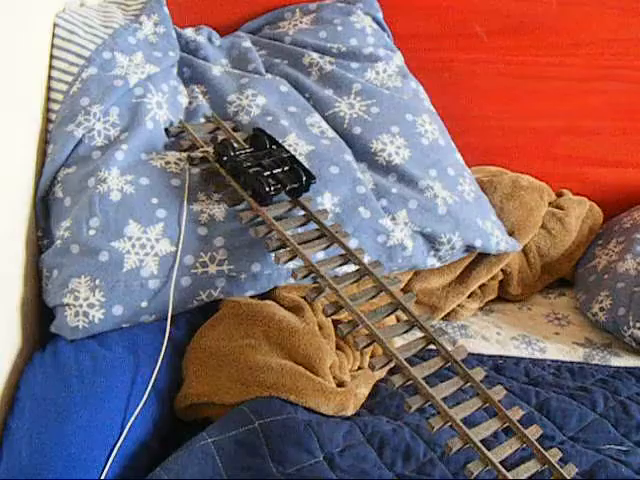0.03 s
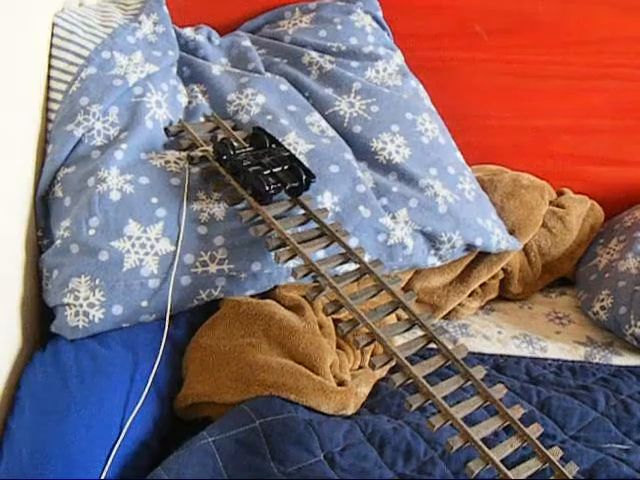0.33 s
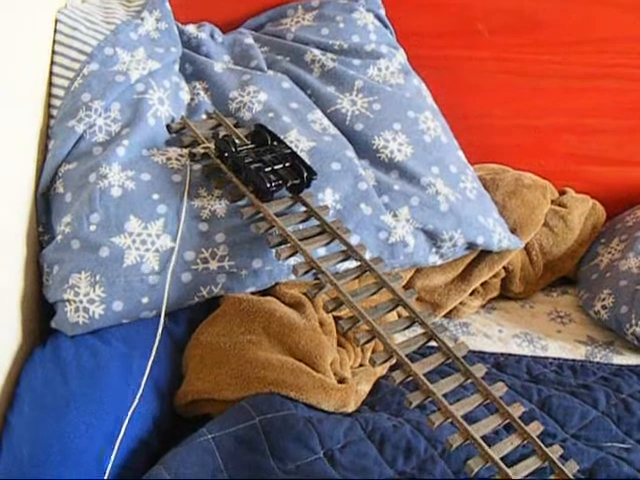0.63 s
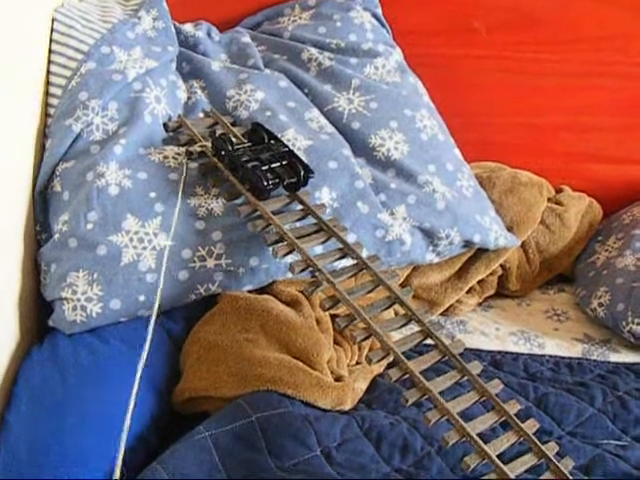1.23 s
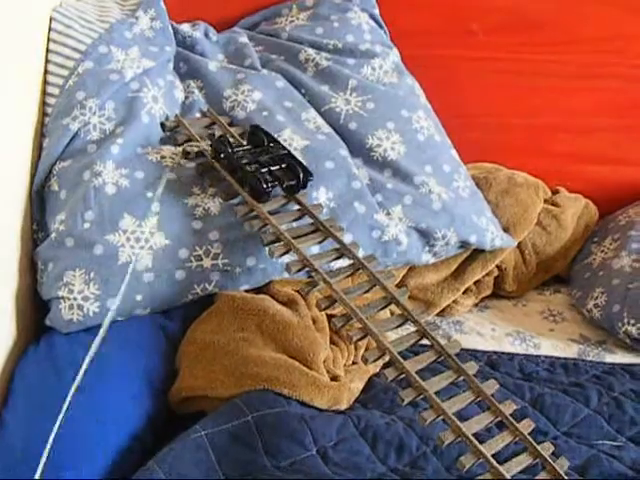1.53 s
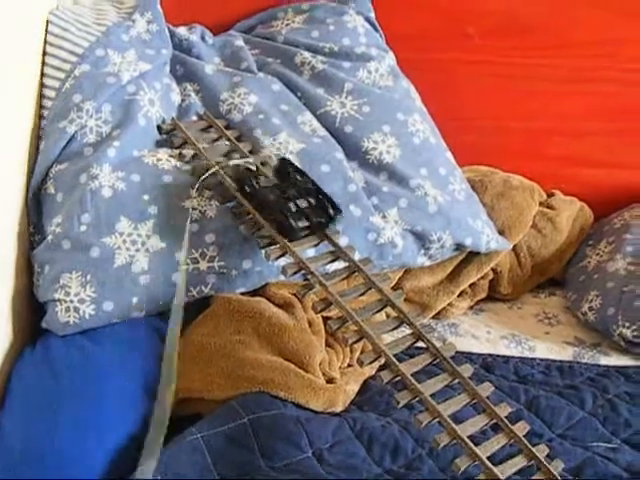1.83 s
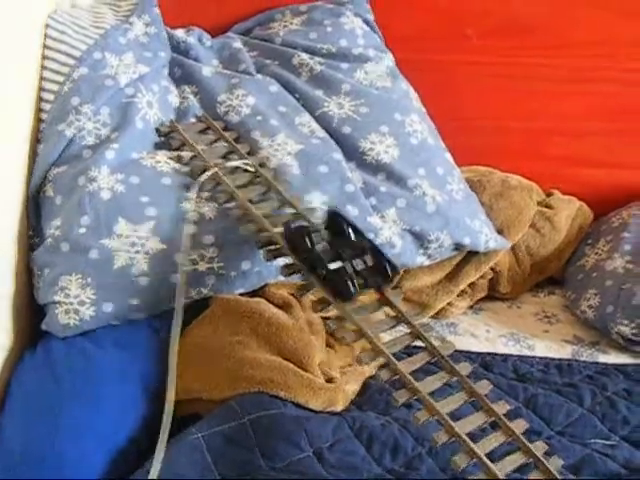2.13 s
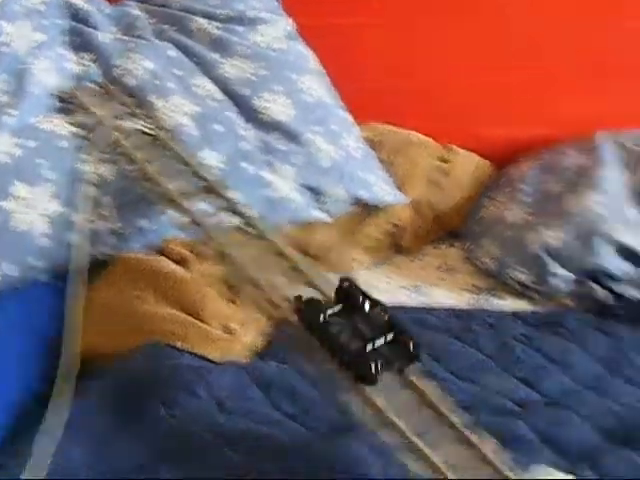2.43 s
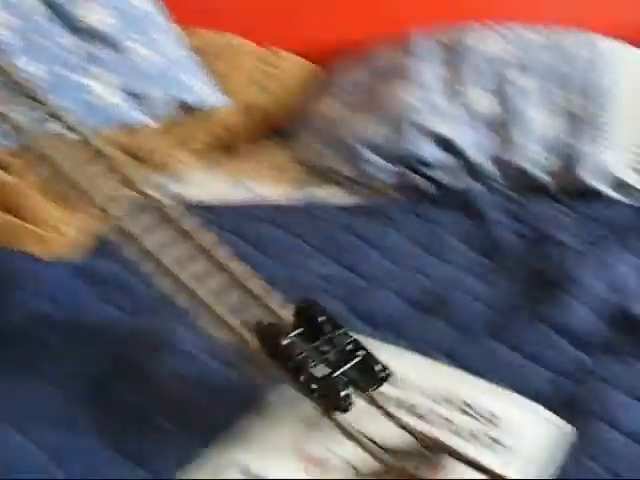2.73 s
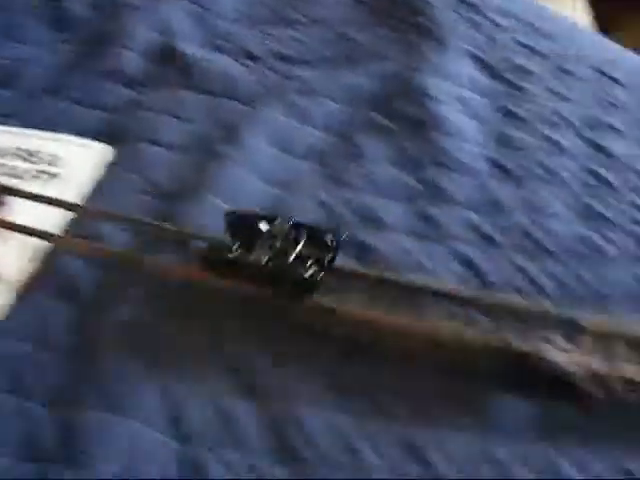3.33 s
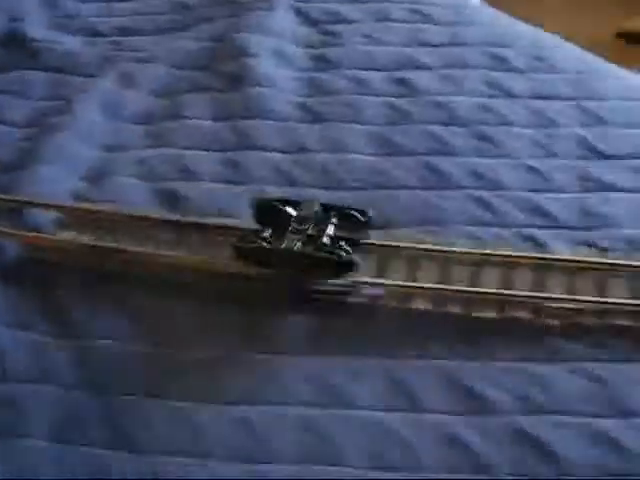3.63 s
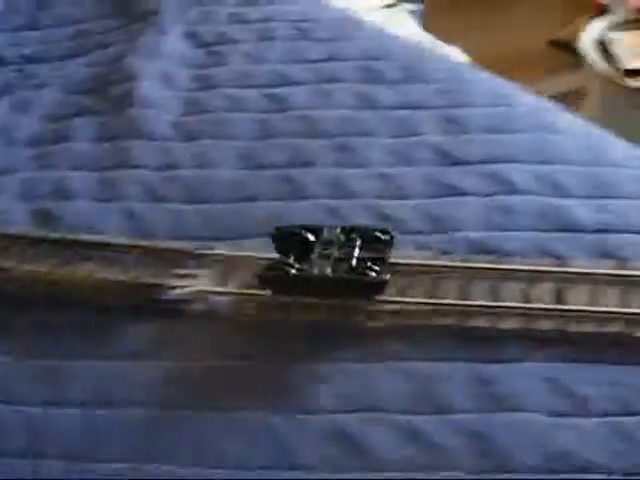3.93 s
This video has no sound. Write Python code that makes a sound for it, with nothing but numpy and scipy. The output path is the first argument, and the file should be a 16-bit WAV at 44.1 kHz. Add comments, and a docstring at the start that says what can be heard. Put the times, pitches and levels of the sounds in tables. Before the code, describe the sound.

Model train wheels whirr and clatter along rails after a few light finger clicks.

```python
"""A small model-railway truck whirrs down a sloping track laid on soft bedding, in a quiet room. First fingers
click against it, then it drops onto its wheels and rolls. Rough rails shake the bedding, track, frame and
wheels. Wheel rims scrape, a wheel sings and the wheels knock over rail joints. A crude recorder rounds the
sound to coarse steps and holds each one, adding a gritty, metallic treble."""
import sys
import numpy as np
from scipy import signal
from scipy.fft import rfft, irfft
from scipy.io import wavfile

SR = 44100
rng = np.random.default_rng(int(sys.argv[2]) if len(sys.argv) > 2 else 0)


def output_pcm(signal):
    """Save a mono or channel-first signal as 16-bit PCM at the path in sys.argv[1].

    Samples are clipped to [-1, 1] before scaling.
    """
    pcm = np.clip(np.atleast_2d(signal).T, -1, 1) * 32767
    wavfile.write(sys.argv[1], SR, np.round(pcm).astype(np.int16))


N = 176400
T = np.arange(N) / SR

# the tone of the room's hush: pitch_hz, relative_db
ROOM_TONE = [(25, -2.5), (60, 0), (150, 0.5), (300, -5), (600, -8.5), (1100, -9.5), (1600, -15.5),
             (2100, -21.5), (2700, -36)]
# fingers click on the truck: start_s, level_db, extra_low_ring_db
FINGER_CLICKS = [(0.263, -23.5, -3.5), (0.2656, -16.5, 3.5), (0.2698, -26, 1), (1.573, -33.5, -8),
                 (1.59, -20.5, -4)]
# the notes in one click (a fade is a drop of 60 dB): pitch_hz, relative_db, fade_s
CLICK_NOTES = [(313.5, -7.5, 0.031), (409.4, -10, 0.054), (708, -2, 0.018), (1018, -6.5, 0.04),
               (1340, -13.5, .025), (1620, -18.5, 0.027), (2246, -15.5, .02)]
# small parts tick: start_s, level_db, pitch_hz
PART_TICKS = [(.665, -55, 1300), (.727, -30.5, 1800), (.730, -34, 1830), (0.997, -30.5, 1170),
              (1.197, -33, 1135), (1.395, -35.5, 1376), (1.709, -20.5, 1470), (1.811, -33.5, 1310),
              (1.839, -33, 1410), (1.848, -26.5, 1535), (1.852, -33, 1520), (1.926, -34, 1466)]
# the track bumps on its bedding: peak_s, level_db, pitch_hz, half_length_s
TRACK_THUDS = [(1.225, -45, 58, 0.022), (1.725, -37.5, 153.5, 0.016), (2.249, -34.5, 87, 0.033),
               (2.452, -30, 88, .022), (3.11, -32.5, 100, 0.015), (3.128, -36, 58, 0.014)]
# the notes in the jolt from the hardest joint: pitch_hz, level_db, fade_s
JOLT_NOTES = [(235, -10, 0.022), (510, -3, 0.0057), (1560, -16, .005)]
# a wheel sings: peak_s, level_db, half_length_s
WHEEL_SINGS = [(2.627, -49, 0.18), (2.933, -41.5, 0.064), (3.2, -39.5, 0.13), (3.613, -50, 0.046)]
# wheel rims rub the rail: peak_s, level_db, rise_s, fall_s
RIM_SCRAPES = [(1.712, -36.5, .0015, 0.012), (1.755, -45.5, 0.012, 0.025), (2.0, -47.5, .08, 0.13),
               (2.052, -27.5, 0.021, 0.015), (2.669, -35.5, 0.017, .02), (3.12, -42, .04, 0.054),
               (3.188, -30.5, 0.078, 0.11), (3.25, -23.5, 0.02, 0.019), (3.611, -40, .02, 0.032),
               (3.964, -32.5, 0.016, 0.015), (3.992, -17, 0.0041, 0.024)]
# wheels land and cross joints: start_s, track_db, frame_db, wheels_db
WHEEL_KNOCKS = [(1.7095, -25, -26.5, -24), (1.7139, -19.5, -21, -23), (1.726, -23.5, -25, -37),
                (1.747, -28.5, -26, -35), (1.762, -25, -27, -35), (2.335, -21, -24.5, -24),
                (2.542, -23, -15, -40), (2.663, -17.5, -26, -23), (3.0115, -17, -7.5, -15),
                (3.0137, -22.5, -8.5, -10), (3.072, -15, -22, -31), (3.08, -25, -8.5, -14),
                (3.0864, -18, -13, -7), (3.103, -23, -19, -35), (3.15, -14.5, -21, -21),
                (3.171, -31, -12, -9), (3.534, -27, -29, -25), (3.555, -26, -23, -38),
                (3.729, -18.5, -13.5, -27), (3.8812, -21, -18, -21), (3.988, -24, -11, -15)]
# resonances, the notes each part likes to ring at: pitch_hz, width_hz, relative_db
SING_NOTES = [(2250, 45, 0)]
BEDDING_NOTES = [(35.6, 25, -13), (87.7, 35, -9.5), (121.3, 30, -6), (153.2, 26, -1), (190, 45, -3.5),
                 (224, 33, -9)]
TRACK_NOTES = [(261.3, 49, -6), (304, 25, -5.5), (335, 29, 1), (357.6, 30, -1.5), (429, 40, -6.5)]
FRAME_NOTES = [(466, 29, 2.5), (549, 34, -2), (626, 35, 2), (672.6, 30, -1.5), (738, 60, -2.5),
               (825, 15, 0), (861, 27, 2), (968.5, 60, -2), (1033, 67, -4), (1143, 60, -3)]
WHEEL_NOTES = [(1287, 110, -5.5), (1372, 45, -1.5), (1418, 60, -2), (1550, 120, -5.5), (1698, 150, -9),
               (1898, 90, -10), (2221, 59, -8.5), (2606, 220, -25)]
# rolling loudness before each part's trim, in three stages (gathering speed, downhill, on the level):
# time_s, bedding_db, track_db, frame_db, wheels_db
ROLL_STAGES = [
    [(1.87, -45, -50.5, -65.5, -50), (1.928, -32.5, -50, -49, -50), (1.95, -37, -38.5, -47.5, -49.5),
     (2.004, -38.5, -42.5, -51, -44.5), (2.058, -39, -40.5, -37.5, -39.5), (2.156, -35, -37, -51.5, -49.5),
     (2.218, -37.5, -34, -40, -48.5), (2.368, -36, -34, -37.5, -46), (2.4, -38, -30.5, -39, -43.5)],
    [(2.43, -36.5, -33, -31.5, -43.5), (2.458, -32, -39, -39, -46), (2.49, -39.5, -33, -33.5, -41),
     (2.716, -33, -30.5, -31.5, -40.5), (2.742, -42, -36.5, -34, -40), (2.774, -36, -29, -33.5, -41),
     (2.944, -42.5, -31.5, -30, -38), (3.042, -36, -29, -27.5, -34), (3.06, -31.5, -30.5, -24, -36.5)],
    [(3.115, -35.5, -27.5, -30, -29.5), (3.273, -34, -40, -33.5, -43), (3.355, -46, -42, -40.5, -48),
     (3.505, -44, -41, -43.5, -45), (3.559, -38, -37.5, -36.5, -45), (3.605, -40, -37.5, -37.5, -42.5),
     (3.801, -29.5, -39, -36.5, -42.5), (3.951, -42.5, -32.5, -33, -41.5), (3.97, -37, -44, -29, -42.5)],
]


def from_db(db):
    """Turn decibels into a volume factor."""
    return 10 ** (np.asarray(db) / 20)


def unit_power(sound):
    """Scale a sound to an average power of 1."""
    return sound / np.sqrt(np.mean(sound ** 2) + 1e-20)


def filtered(sound, kind, edge_hz, order=2):
    """Keep the low part, the high part or a middle band of a sound."""
    return signal.sosfilt(signal.butter(order, edge_hz, kind, fs=SR, output="sos"), sound)


def taps(times_s, level_db):
    """One sharp tap at each time."""
    out = np.zeros(N)
    np.add.at(out, (np.atleast_1d(times_s) * SR).astype(int), from_db(level_db))
    return out


def swell(peak_s, level_db, half_length_s):
    """A smooth, bell-shaped rise and fall in loudness."""
    return from_db(level_db) * np.exp(-((T - peak_s) / half_length_s) ** 2)


def ring(hits, pitch_hz, fade_s):
    """Each hit starts one pure note that dies away."""
    decay = from_db(-60 / (fade_s * SR))
    angle = 2 * np.pi * pitch_hz / SR
    return signal.lfilter([0, np.sin(angle)], [1, -2 * decay * np.cos(angle), decay ** 2], hits + 1e-18)


def resonate(push, notes, damping=1, in_step=False):
    """A part rings at all its notes, in step where it is struck. More damping shortens the ring."""
    out = 0
    for k, (hz, width_hz, db) in enumerate(notes):
        decay = np.exp(-np.pi * width_hz * damping / SR)
        sign = 1 if in_step else (-1) ** k
        feedback = [1, -2 * decay * np.cos(2 * np.pi * hz / SR), decay ** 2]
        note = signal.lfilter([1, 0, -1], feedback, push + 1e-18)
        out += sign * from_db(db) * (1 - decay ** 2) / 2 * note
    return filtered(out, "band", [notes[0][0] * 0.48, notes[-1][0] * 1.6])


def roughness(specks_per_s=4500, spread_db=2):
    """Tiny rough specks give many random pushes of uneven size."""
    sizes = from_db(spread_db * np.minimum(rng.exponential(1, N), 4))
    signs = rng.choice([-1, 1], N)
    return sizes * signs * (rng.random(N) < specks_per_s / SR)


def room_hush(level_db=-45.5):
    """The room gives a steady, dull hush."""
    hz, db = np.transpose(ROOM_TONE)
    all_hz = np.fft.rfftfreq(N, 1 / SR)
    tone = from_db(np.interp(np.log(all_hz + 1), np.log(hz), db))
    hush = irfft(rfft(rng.standard_normal(N)) * tone, N)
    return from_db(level_db) * unit_power(hush)


def clicks_and_ticks(hollow_below_hz=550, crack_db=-12.5, crack_s=0.0027):
    """Fingers make hollow clicks and small parts tick, each tick with a tiny crack of noise."""
    times_s, level_db, extra_low_db = np.transpose(FINGER_CLICKS)
    out = 0
    for k, (hz, db, fade_s) in enumerate(CLICK_NOTES):
        hits = taps(times_s, level_db + db + extra_low_db * (hz < hollow_below_hz))
        out += (-1) ** k * ring(hits, hz, fade_s)
    noise = unit_power(filtered(rng.standard_normal(N), "band", [600, 2000]))
    for start_s, db, hz in PART_TICKS:
        out += ring(taps(start_s, db), hz, fade_s=0.014)
        fade = (T > start_s) * np.exp(-abs(T - start_s) / crack_s)
        out += from_db(db + crack_db) * fade * noise
    return filtered(out, "high", edge_hz=233)  # the small body gives off no bass


def track_thuds():
    """The track swings on its bedding with soft, low thuds."""
    out = 0
    for peak_s, db, hz, half_length_s in TRACK_THUDS:
        swing = np.sqrt(2) * np.sin(2 * np.pi * (hz * T + rng.random()))
        out += swell(peak_s, db, half_length_s) * swing
    return out


def singing_wheel():
    """Rubbing makes a wheel sing briefly on one high note."""
    loudness = sum(swell(*squeak) for squeak in WHEEL_SINGS)
    return loudness * unit_power(resonate(roughness(), SING_NOTES))


def rim_scrapes():
    """A wheel's rim rubs the rail and lets go, making the wheels ring."""
    power = 0
    for peak_s, db, rise_s, fall_s in RIM_SCRAPES:
        shape = np.exp(-np.maximum((peak_s - T) / rise_s, (T - peak_s) / fall_s))
        power += (from_db(db) * shape) ** 2
    return np.sqrt(power) * unit_power(resonate(roughness(), WHEEL_NOTES, damping=0.8))


def hard_jolt(start_s=3.085):
    """The hardest joint, at the foot of the slope, gives the truck one heavy, dead blow."""
    return sum(ring(taps(start_s, db), hz, fade_s) for hz, db, fade_s in JOLT_NOTES)


def wheel_knocks(damping=1.8):
    """Each blow rings the track, frame and wheels; the pressing wheel cuts the ring short."""
    times_s, *levels_db = np.transpose(WHEEL_KNOCKS)
    out = 0
    for notes, db in zip((TRACK_NOTES, FRAME_NOTES, WHEEL_NOTES), levels_db):
        one_knock = resonate(signal.unit_impulse(SR // 10), notes, damping, in_step=True)
        out += resonate(taps(times_s, db), notes, damping, in_step=True) / abs(one_knock).max()
    return filtered(out, "low", edge_hz=2230)  # a plastic wheel softens each blow


def rolling_truck(start_s=1.72, trims_db=(-1.5, 0.5, 0.5, 2)):
    """Rough rails make the bedding drone, the track rumble, the frame whirr and the wheels ring."""
    times_s, *levels_db = np.transpose(np.vstack(ROLL_STAGES))
    parts = (BEDDING_NOTES, TRACK_NOTES, FRAME_NOTES, WHEEL_NOTES)
    pushes = roughness()
    out = 0
    for notes, trim_db, db in zip(parts, trims_db, levels_db):
        loudness = from_db(trim_db + np.interp(T, times_s, db))
        out += loudness * unit_power(resonate(pushes, notes))
    return out * (T > start_s)


def scene():
    """The truck, its track and the room, heard at one close microphone."""
    truck = rolling_truck() + rim_scrapes() + singing_wheel() + wheel_knocks() + hard_jolt()
    return (truck + track_thuds() + clicks_and_ticks() + room_hush())[None]


def record(dry, hold_samples=8, step=1 / 128, offset=-0.017, start_s=0.163, top_hz=15700):
    """A crude recorder dulls the sound, then rounds and holds it, which adds a gritty treble."""
    dull = filtered(dry, "low", edge_hz=2650, order=8)
    rounded = np.round(dull[:, ::hold_samples] / step) * step + offset  # it sits a little off zero
    held = np.repeat(rounded, hold_samples, axis=1)[:, :N]
    held *= T > start_s  # silent until the recorder starts
    top_cut = signal.ellip(10, 0.1, 80, top_hz, fs=SR, output="sos")
    return signal.sosfilt(top_cut, held)


dry = scene()
out = record(dry)
output_pcm(out)
```